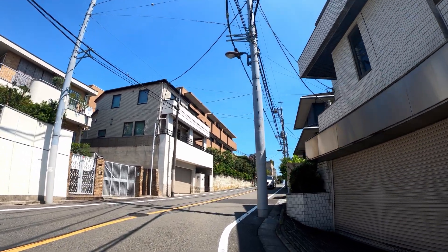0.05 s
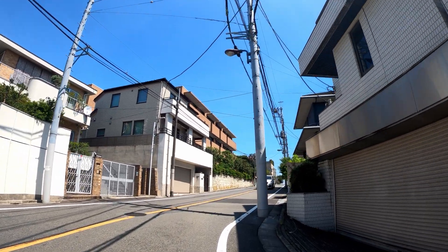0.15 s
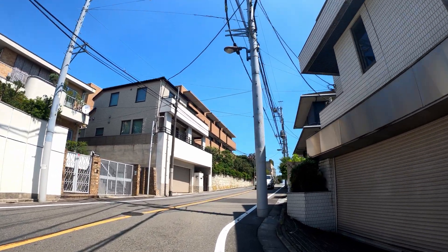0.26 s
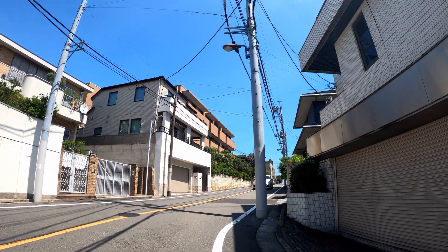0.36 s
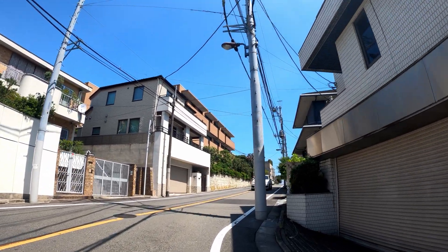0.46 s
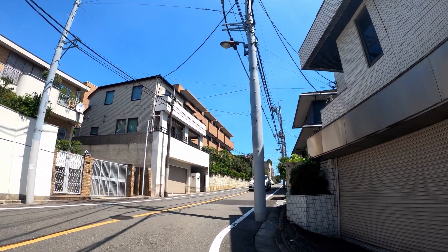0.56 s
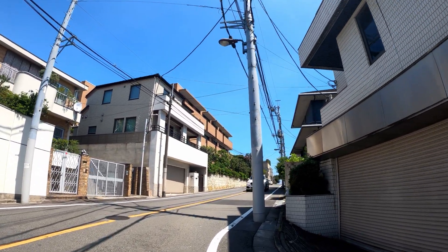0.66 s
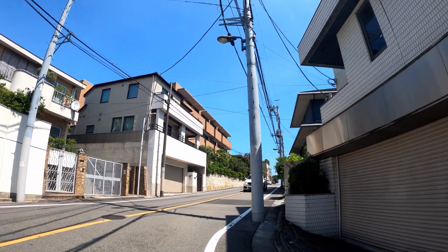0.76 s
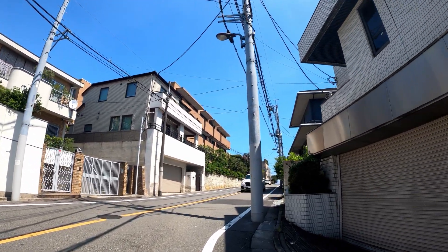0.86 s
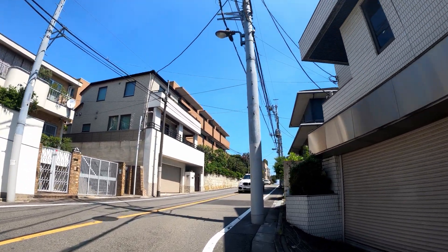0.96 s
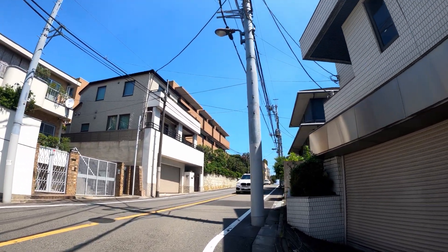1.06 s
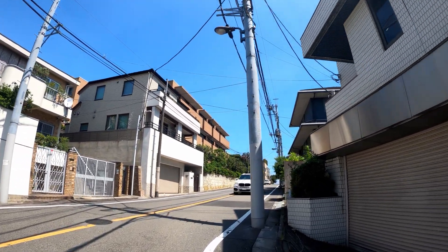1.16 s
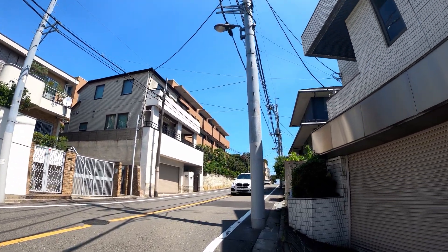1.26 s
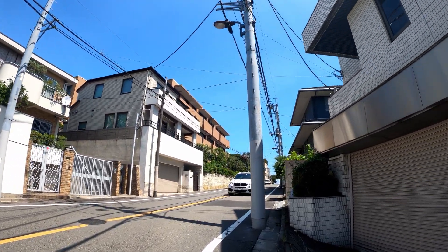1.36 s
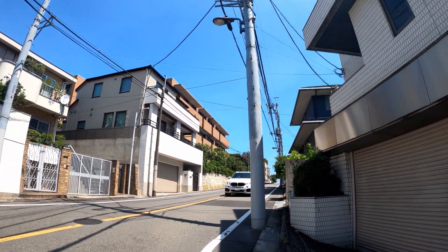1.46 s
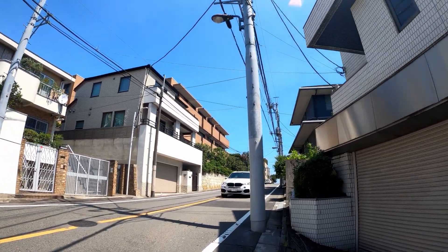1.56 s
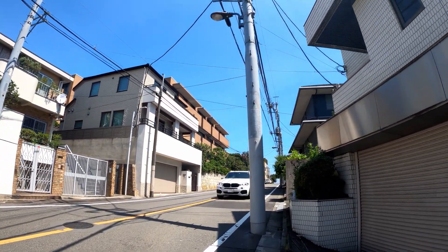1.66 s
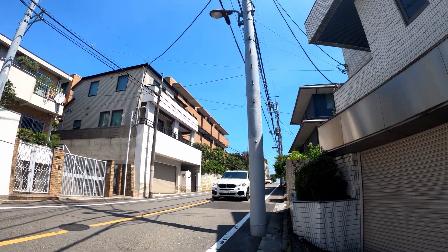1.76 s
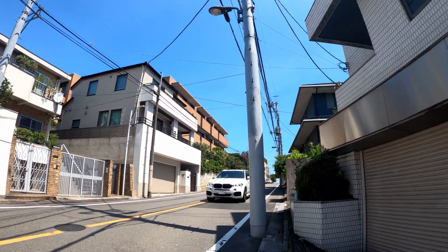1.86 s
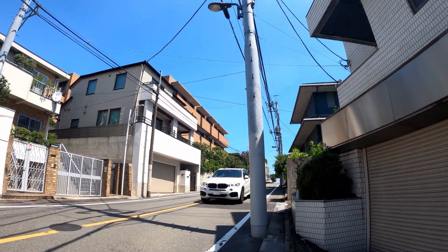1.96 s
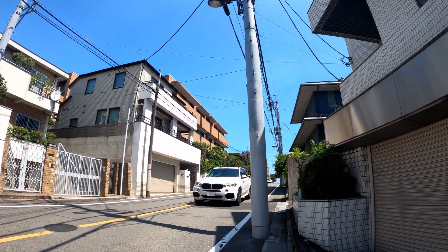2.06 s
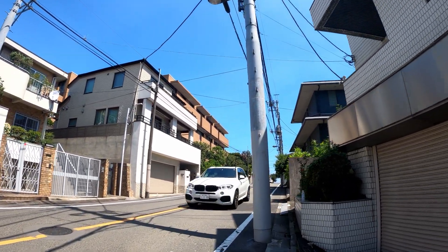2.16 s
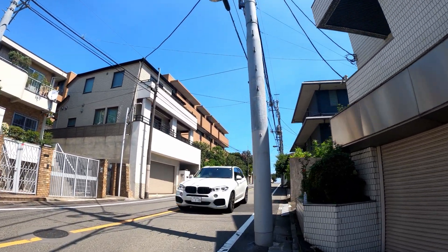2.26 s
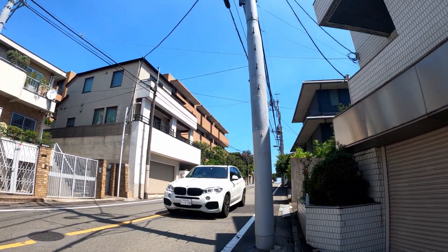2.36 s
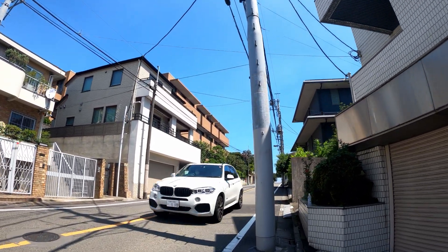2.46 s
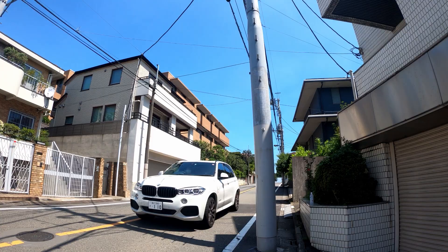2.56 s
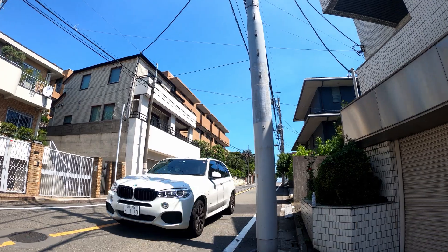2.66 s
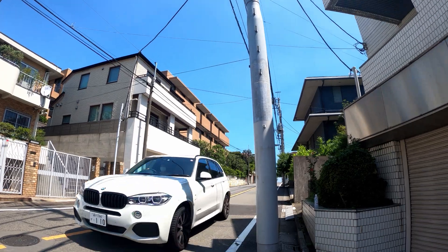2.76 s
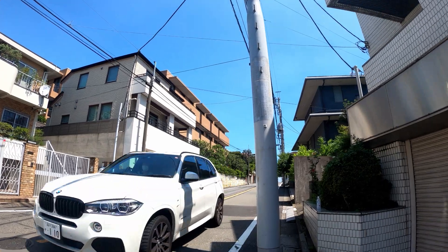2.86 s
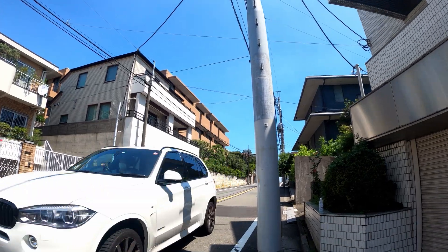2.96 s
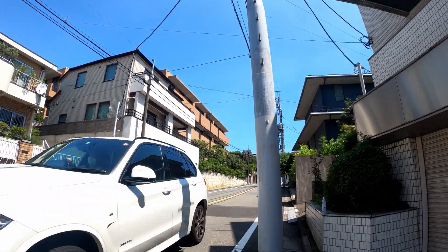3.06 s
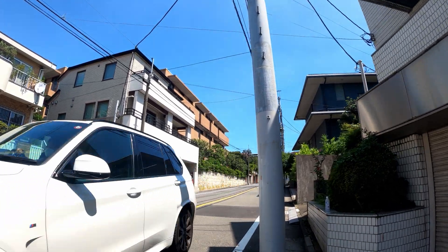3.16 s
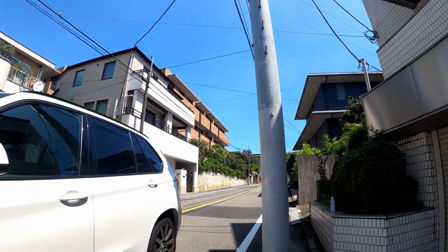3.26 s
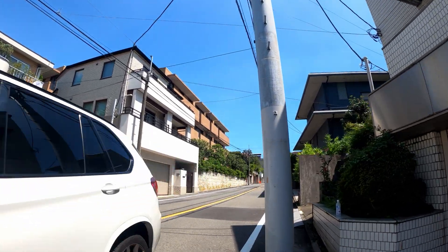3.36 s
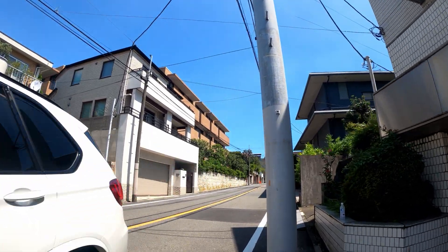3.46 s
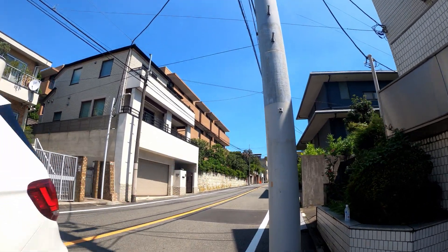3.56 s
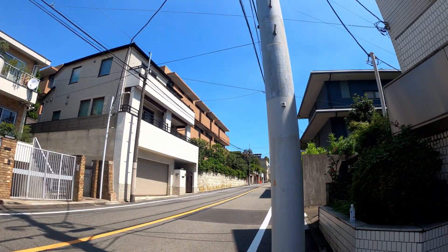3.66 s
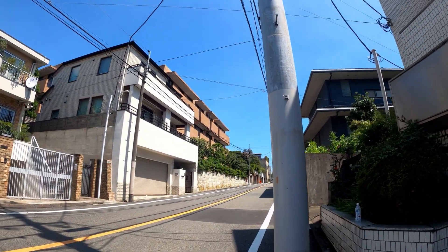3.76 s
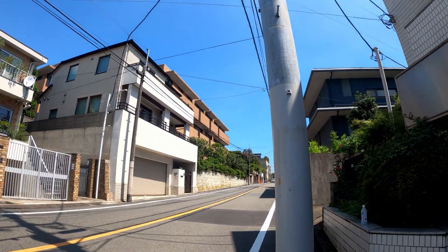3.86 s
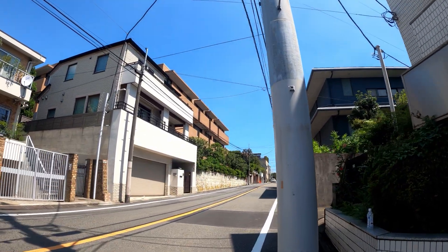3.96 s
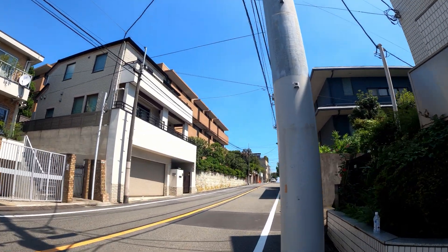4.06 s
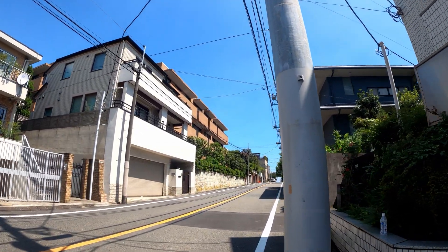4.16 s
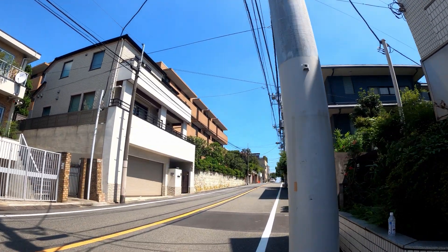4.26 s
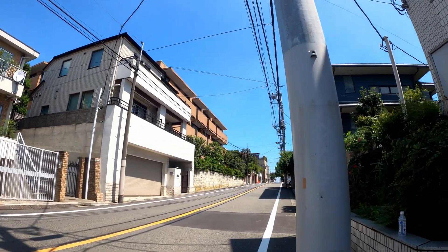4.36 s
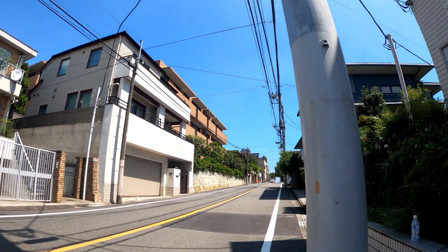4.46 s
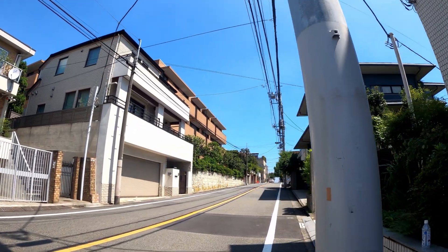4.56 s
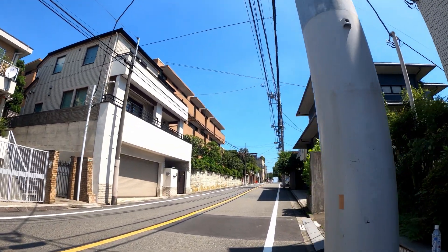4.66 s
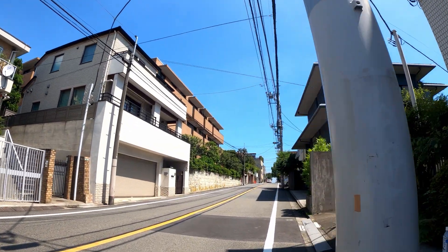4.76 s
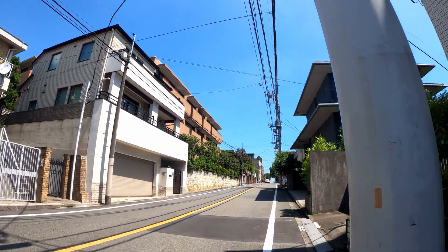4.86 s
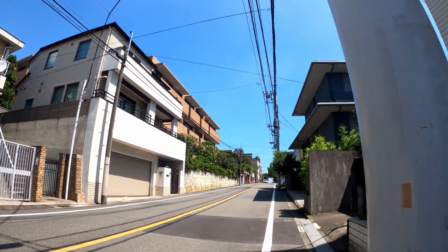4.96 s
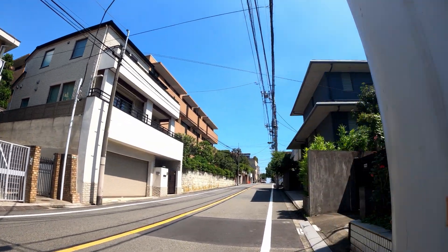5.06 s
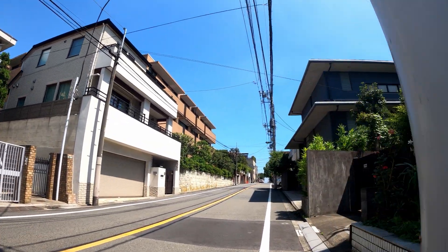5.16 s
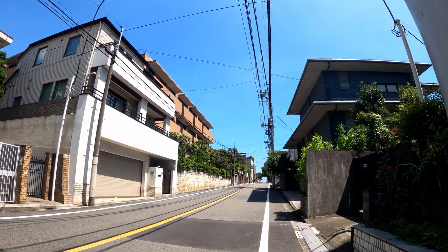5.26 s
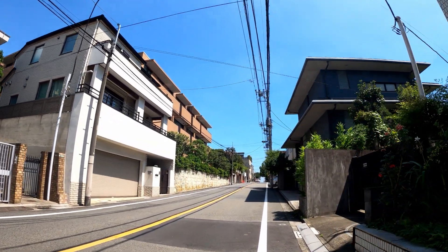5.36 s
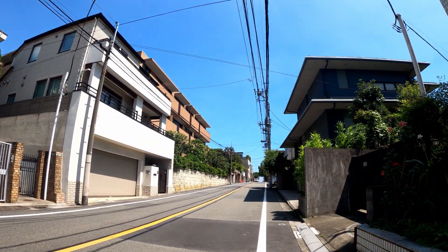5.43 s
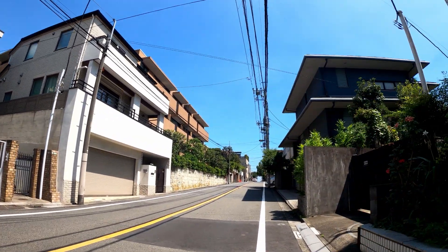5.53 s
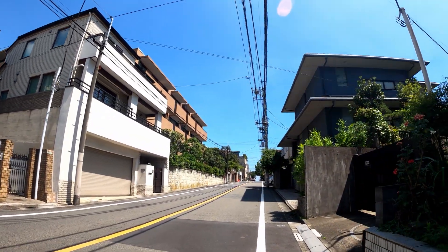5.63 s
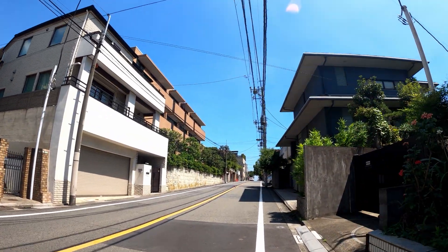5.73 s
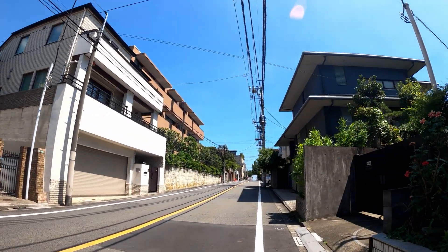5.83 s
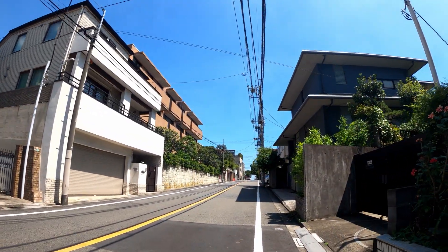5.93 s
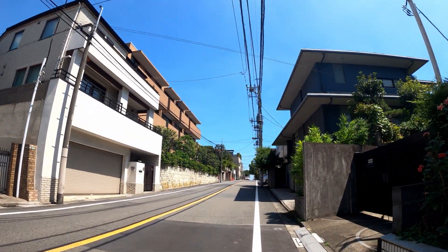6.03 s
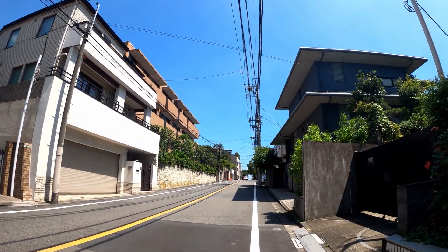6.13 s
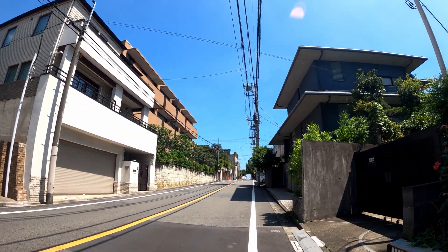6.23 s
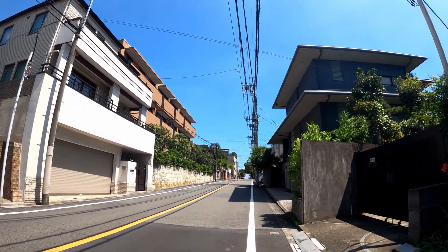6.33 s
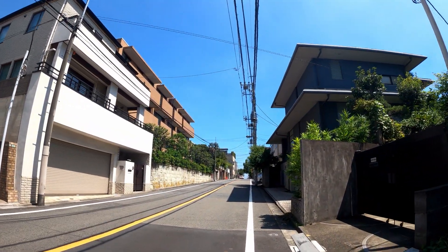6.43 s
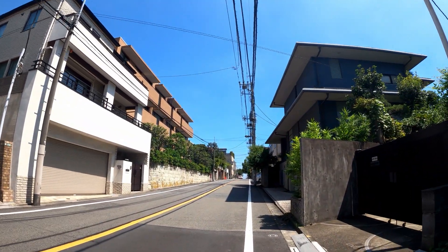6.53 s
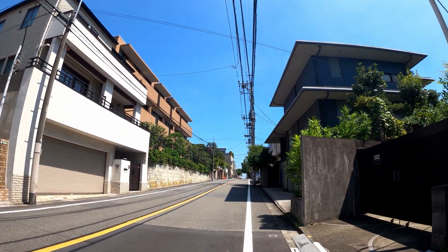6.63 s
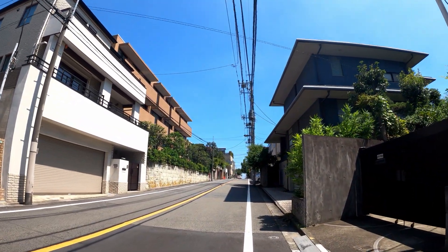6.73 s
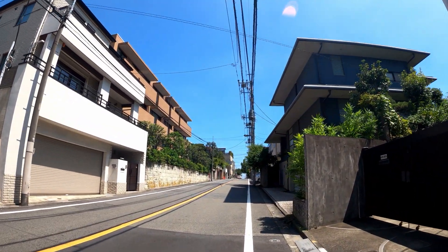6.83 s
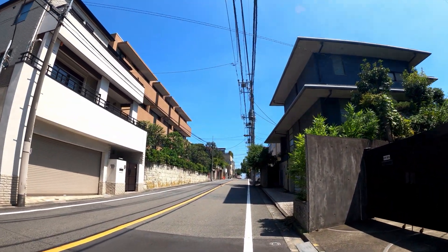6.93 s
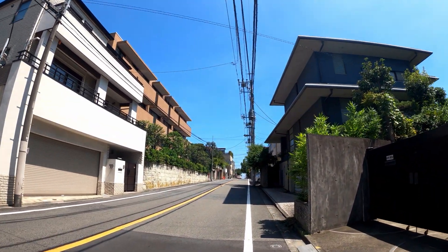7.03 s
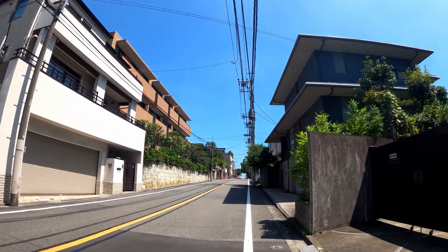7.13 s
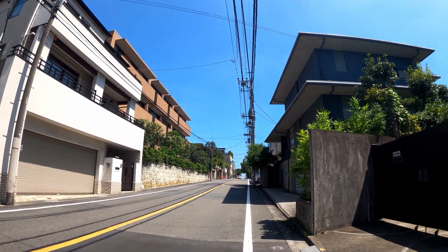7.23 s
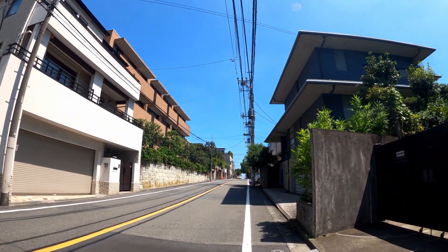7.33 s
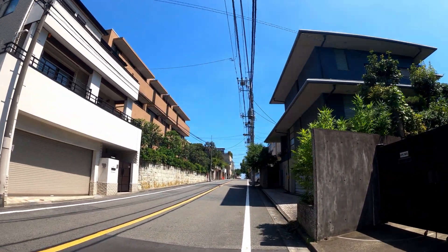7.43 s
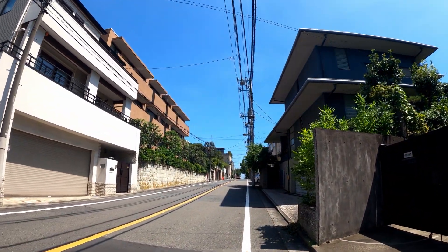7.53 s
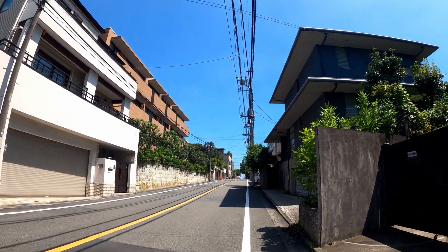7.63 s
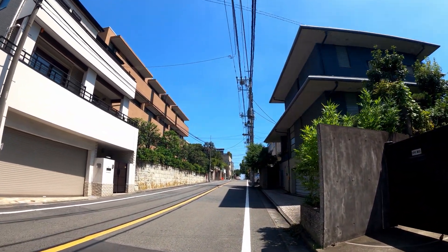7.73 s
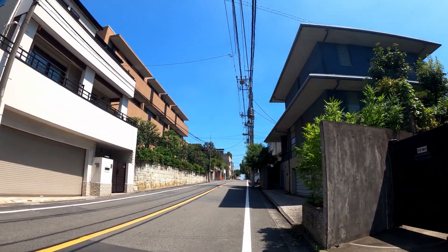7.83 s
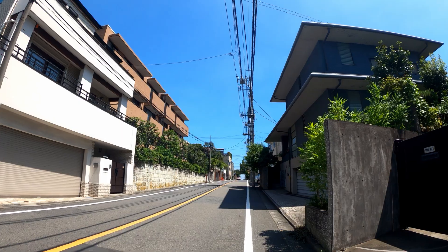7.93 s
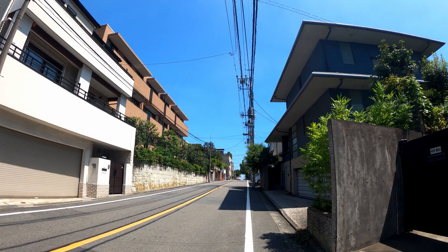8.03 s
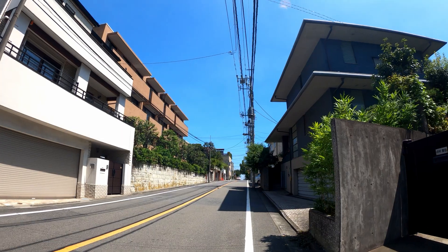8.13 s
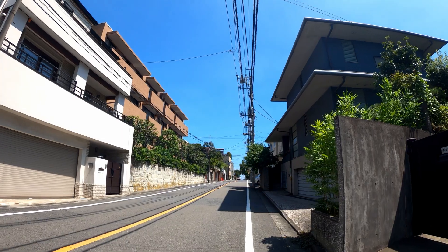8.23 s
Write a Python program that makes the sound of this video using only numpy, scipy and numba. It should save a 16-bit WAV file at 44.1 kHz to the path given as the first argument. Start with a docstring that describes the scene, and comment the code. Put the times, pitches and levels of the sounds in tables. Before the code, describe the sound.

A car approaches on a quiet summer street, roars past close by, shifts up and fades, while cicadas buzz and wind gusts knock the microphone.

```python
"""A quiet summer street, cicadas near and far, distant town air: noise bands and clicking drum lines.
A car rolls towards a small two-port camera; tyres roar and hum as noise bands, the engine drones as sines.
It passes close at about 3 s, its sizzle moves to the right, the engine shifts up and it pulls away.
Gusts (eddy noise) buffet the ports throughout, hardest at about 6.1 s, with sharp knocks inside the hard ones.
From then the camera folds its ports together below the top octave, narrowing the picture to the end."""
import sys
import numpy as np
from scipy import signal
from scipy.io import wavfile
from scipy.ndimage import uniform_filter1d
from numba import njit

SR = 44100
rng = np.random.default_rng(int(sys.argv[2]) if len(sys.argv) > 2 else 0)


def transcribe(u):
    """Save the signal u as a 16-bit wav file named by the first command-line argument.

    u: samples, shape (n,) or (channels, n), limited to [-1, 1]; the rate is SR.
    q: integer samples, one column per channel.
    """
    v = np.clip(np.atleast_2d(u).T, -1, 1)
    q = np.round(v * 32767).astype(np.int16)
    wavfile.write(sys.argv[1], SR, q)


N = 365588


# The car coming, passing and going. Each row: time in seconds, overall roar level in dB.
CAR_LEVEL = [(0, -38), (.45, -36), (1.35, -35), (2.25, -33), (2.6, -30.5), (3.0, -27.5), (3.3, -30.5),
             (3.6, -32.5), (3.9, -37.5), (4.9, -40.5), (5.15, -41.5), (5.6, -46), (6.1, -52.5),
             (6.7, -55.5), (7.0, -59), (8.29, -65)]
# Body, roar, rush, rasp, hiss, sizzle, fizz and spray of the car. Each row: centre in Hz, level in dB at the
# reference level, share of the level change followed, gain from the tail side in dB, gain when close in dB,
# how late it turns to the tail in seconds, how long the turn takes in seconds, gain in a full swish in dB.
ROAR_PARTS = [(420, -37.5, 0.95, 0.5, 0.5, -0.12, .3, -2), (968, -35.5, 1, 0.17, -0.4, -0.18, .3, 0),
              (1505, -44, 0.93, 3.5, -2, 0.47, 0.95, 3), (2170, -55, 0.89, 10.5, -2, -0.13, 0.13, 11.5),
              (2830, -54, 0.78, 5.5, -1.5, 0.013, 0.15, 7), (4000, -57, 0.72, 2.5, 5, -0.59, 0.33, 4),
              (5000, -63.5, 0.94, 1, 7, -0.069, .3, 6), (8500, -77, 0.92, 5, 9.5, -0.15, .3, 9)]
# Colour of the roar against a smooth slope. Each row: frequency in Hz, level in dB.
ROAR_COLOUR = [(260, -5.5), (400, -4.5), (520, -8.5), (700, -5), (950, -3.5), (1500, -1), (2400, -3),
               (4100, -1.5), (5000, -0.5), (6500, -6), (9400, -1), (12500, -21), (15500, -23.5)]
# Tread-groove resonances. Each row: centre in Hz, width in Hz, level in dB against the roar part.
TREAD = [(440, 70, -9), (945, 140, -7)]
# Brief brighter swells. Each row: peak in seconds, rise in seconds, strength 0 to 1 before its uneven scuffing.
SWISHES = [(3.15, 0.075, 0.4), (4.98, 0.19, 0.12), (5.28, 0.077, 0.89), (5.72, 0.19, 0.34),
           (6.847, 0.075, 0.52)]
# Side of the sizzle. Each row: time in seconds, left minus right in dB.
SIZZLE_PAN = [(2.9, 0.5), (3.8, -13), (5.4, -12), (5.7, -12), (6.7, -8)]
PASS_S, CLOSE_S, LOUD_DB = 3.13, 0.6, -34.5  # abreast at; time spent close; reference level
SWISH_FALL_SHARE = 2.8  # the fall is this much longer than the rise
SWISH_GRAIN, SWISH_GRAIN_RATE = .2, 40  # depth of the uneven scuffing, and steps per second
ROAR_SWELL_DB = .6


def roar():
    """Tread and engine-bay noise; each part of the spectrum swells as its side of the car faces the camera."""
    t = seconds()
    (level_db,), (pan_db,) = curves(CAR_LEVEL), curves(SIZZLE_PAN)

    swish = 0
    for peak, rise, strength in SWISHES:
        away = np.maximum((peak - t) / rise, (t - peak) / rise / SWISH_FALL_SHARE)
        swish = swish + strength * np.exp(-away ** 2)
    swish = swish * (1 + SWISH_GRAIN * walk(SWISH_GRAIN_RATE))

    parts_db = []
    for _, db, follow, tail_db, close_db, late, turn, swish_db in ROAR_PARTS:
        since_pass = t - PASS_S - late
        tail = tail_db * (1 + np.tanh(since_pass / turn)) / 2
        close = close_db * np.exp(-(since_pass / CLOSE_S) ** 2)
        swell = swish_db * swish + ROAR_SWELL_DB * walk(rate=4.79)
        parts_db.append(db + follow * (level_db - LOUD_DB) + tail + close + swell)
    parts_db = np.array(parts_db)

    out = sum(heard(hz, width) * undb(parts_db[1] + db) for hz, width, db in TREAD)
    part_log_hz = np.log(np.transpose(ROAR_PARTS)[0])
    for hz in bands(271.7, 15500):
        # each band blends the two parts beside it in pitch
        share = [np.interp(np.log(hz), part_log_hz, row) for row in np.eye(len(ROAR_PARTS))]
        band_db = share @ parts_db + at(ROAR_COLOUR, hz)[0] + 0.8 * walk(9)
        panned = share[-3] + .5 * share[-2]  # sizzle fully, fizz by half
        side_db = panned * np.array([pan_db, -pan_db]) / 2
        out = out + heard(hz, .24 * hz) * undb(band_db + side_db)
    return out


# Exhaust. Each row: time in seconds, firing rate in Hz, then the levels in dB of the firing rate itself,
# its second order and its third order.
ENGINE = [(1.5, 69.8, -59, -41, -40), (1.95, 69.35, -35.5, -40, -45), (2.35, 68, -33, -39, -42),
          (2.73, 64.76, -30, -29.5, -29.5), (3.0, 62.3, -25.5, -36, -33), (3.26, 59.44, -18.5, -35, -37),
          (3.55, 56.46, -21.5, -40, -41), (3.72, 56.08, -27, -44, -25.5), (3.89, 57.1, -38.5, -50, -34),
          (4.2, 61.7, -29.5, -45, -47), (4.48, 70.35, -37, -48, -46), (4.63, 75, -27, -20, -47),
          (4.84, 79.9, -28.5, -45, -47), (5.17, 78, -28, -37, -50), (5.38, 69.13, -70, -36.5, -52),
          (5.62, 66.4, -26, -33.5, -45), (5.8, 63.8, -38, -35.5, -39), (5.9, 59.7, -31, -47, -48),
          (6.25, 59.4, -66, -80, -78)]
# Waver of those three orders in dB: the higher ones break up more.
ORDER_WAVER_DB = .8, 2.5, 3


def engine():
    """Firings leave the silencer as a drone with wavering upper orders and a faint half order."""
    hz, *order_db = curves(ENGINE)
    turn = 2 * np.pi * np.cumsum(hz * (1 + 0.00603 * walk(14))) / SR
    orders = 0
    for order, (db, waver) in enumerate(zip(order_db, ORDER_WAVER_DB), start=1):
        orders = orders + undb(db + waver * walk(12)) * np.sin(order * turn)
    half_order = 0.063 * undb(order_db[0]) * np.sin(turn / 2)
    return np.sqrt(2) * (orders + half_order)


# Pitch of the tyre hum, sagging as the car passes. Each row: time in seconds, frequency in Hz.
HUM_HZ = [(0, 219), (1.5, 216), (2.5, 212), (3.1, 202), (8.29, 198)]
# Tyre hum. Each row: time in seconds, level in dB before its waver.
HUM_LEVEL = [(0, -42), (.7, -31), (1.05, -36), (1.55, -23), (1.75, -29.5), (2.2, -22), (2.5, -23.5),
             (2.68, -40), (2.92, -31.5), (3.08, -23), (3.2, -35), (3.36, -26), (3.5, -37), (3.65, -36.5),
             (3.81, -26), (3.95, -36), (4.2, -47), (4.52, -24), (4.7, -40.5), (5.4, -36.5), (5.9, -41),
             (6.3, -62), (8.29, -51)]
# Boom of the body. Each row: time in seconds, level in dB.
BOOM_LEVEL = [(0, -41.5), (0.449, -31.5), (.9, -42.5), (1.9, -30.5), (2.15, -34.5), (2.9, -24), (3.3, -37),
              (3.53, -25.5), (3.9, -33), (4.24, -26.5), (4.75, -33), (4.951, -24), (5.32, -36), (5.9, -43),
              (6.3, -46), (8.29, -59)]
# Road rumble. Each row: time in seconds, level in dB of its lowest band.
RUMBLE_LEVEL = [(0, -34), (1.0, -30.5), (1.9, -34.5), (2.3, -34), (3.0, -29), (3.8, -31.5), (4.8, -36.5),
                (5.35, -31), (5.9, -36.5), (6.3, -38), (8.29, -89)]
HUM_WIDTH_HZ, BOOM_HZ, BOOM_WIDTH_HZ = 16, 153, 30
HUM_WAVER_DB, HUM_WAVER_RATE, HUM_WANDER_HZ = 1.8, 20, 1  # rate in steps per second


def hum():
    """The air ring inside the tyres, a boom of the body and the road's rumble: noise in narrow resonances."""
    (hum_hz,), (hum_db,) = curves(HUM_HZ), curves(HUM_LEVEL)
    (boom_db,), (rumble_db,) = curves(BOOM_LEVEL), curves(RUMBLE_LEVEL)
    ring_level = undb(hum_db + HUM_WAVER_DB * walk(HUM_WAVER_RATE))
    ring = ring_level * steadier(heard(hum_hz + HUM_WANDER_HZ * walk(5), HUM_WIDTH_HZ), .09, .7)
    boom = undb(boom_db) * steadier(heard(BOOM_HZ, BOOM_WIDTH_HZ), .03, .4)
    road = heard(36.7, 41) + 0.34 * heard(82.4, 39) + 0.31 * heard(106.0, 46) + .5 * heard(231.0, 82)
    return ring + boom + undb(rumble_db) * road


# Gusts on the microphone ports. Each row: peak in seconds, half length in seconds, rumble in dB and flutter
# in dB (both before PORT_LIFT_DB), left minus right in dB.
GUSTS = [(0.82, 0.12, -40, -56, 5), (1.443, 0.091, -30.5, -40.5, 1), (1.66, 0.11, -33, -48, -11),
         (1.746, 0.0547, -21.5, -33, -5), (1.984, 0.12, -31, -54.5, -5), (2.098, 0.04526, -26, -34, -12),
         (2.202, 0.04294, -30, -33.5, -14), (2.375, 0.047, -34, -39.5, -4), (2.734, 0.0755, -29, -38.5, -5),
         (2.9, 0.03, -32, -49, -15), (3.176, 0.036, -29, -43.5, -7), (3.502, 0.02835, -26, -31, -2),
         (3.748, 0.0367, -27.5, -32.5, -12), (3.896, 0.077, -36, -58, 5), (5.513, 0.091, -32.5, -41, -2),
         (5.75, 0.18, -33, -61, -2), (5.935, 0.051, -25, -44.5, 7), (5.981, 0.0393, -28.5, -38, 14),
         (6.06, 0.0195, -17, -30, -4), (6.085, 0.0199, -17, -25.5, -1), (6.111, 0.01965, -17, -23, -0.5),
         (6.132, 0.02104, -25, -24, 18), (6.179, 0.02555, -22, -27.5, -0.5),
         (6.216, 0.0361, -20.5, -33, -3), (6.284, 0.0384, -24.5, -34, -11), (6.329, 0.0357, -29.5, -36, 13),
         (6.446, 0.0493, -34.5, -34.5, 12), (6.579, 0.0396, -37, -34, 9), (6.624, 0.035, -32, -45.5, -7),
         (6.904, 0.1162, -39, -38.5, -6), (7.13, 0.02211, -28.5, -32.5, -7), (7.164, 0.0249, -31, -37, -4),
         (7.209, 0.0249, -23, -29.5, 1), (7.238, 0.0154, -30, -33, 17), (7.292, 0.0392, -30, -35, -1),
         (7.371, 0.039, -33, -40, 5), (7.484, 0.04, -34, -41, 1), (7.678, 0.088, -36.5, -49, 7.5),
         (7.995, 0.11, -40, -39.5, -1)]
GUST_FALL_DB, GUST_RISE_SHARE = 9, .8  # fall over a half length; the rise takes this share of the time
BREEZE_DB, BREEZE_FLUTTER_DB = -55.5, -58  # faint breeze beneath, also before the lift
PORT_LIFT_DB = 3


def gusts():
    """Rumble dB, flutter dB and pan: gusts rise and fall alike over a breeze; the stronger sway the side more."""
    peak, half, rumble_db, flutter_db, pan_db = np.transpose(GUSTS)[:, :, None]
    t = seconds()[::32]  # a coarse grid is enough
    away = (t - peak) / half
    fall_db = GUST_FALL_DB * np.maximum(away, -away / GUST_RISE_SHARE)
    # powers add up
    rumbles, flutters = undb(2 * (rumble_db - fall_db)), undb(2 * (flutter_db - fall_db))
    rumble = rumbles.sum(axis=0) + undb(2 * BREEZE_DB)
    flutter = flutters.sum(axis=0) + undb(2 * BREEZE_FLUTTER_DB)
    pan = (pan_db * rumbles).sum(axis=0) / rumble
    return curves(np.transpose([t, 10 * np.log10(rumble), 10 * np.log10(flutter), pan]))


def eddies(speed, lo_hz, hi_hz):
    """A frozen train of like-sized eddies carried past a port: the faster the air, the higher it sounds."""
    train = signal.sosfilt(signal.butter(5, hi_hz, fs=SR, output="sos"), rng.standard_normal(3 * N))
    train = signal.sosfilt(signal.butter(2, lo_hz, "high", fs=SR, output="sos"), train)
    train = steadier(train, 1 / lo_hz, .4)
    return unit(np.interp(np.cumsum(speed), np.arange(3 * N), train))


def wind():
    """Air buffets each port with its own unrelated eddies; harder gusts move faster."""
    rumble_db, flutter_db, pan_db = gusts()
    speed = np.clip(undb(.4 * (flutter_db + 35)), .7, 2.9)
    ports = []
    for side in (1, -1):
        flutter = eddies(speed, 85, 225) * undb(flutter_db + PORT_LIFT_DB)
        rumble = eddies(np.sqrt(speed), 40, 100) * undb(rumble_db + PORT_LIFT_DB)
        ports.append((flutter + rumble) * undb(side * pan_db / 2))
    return np.array(ports)


# Sharp knocks on the ports inside hard gusts. Each row: peak in seconds, pitch in Hz, peak level in dB,
# left minus right in dB, fall in turns of the pitch.
KNOCKS = [(6.072, 420, -17, 9, 1.8), (6.094, 304, -13, 5, 1), (6.104, 322, -20, 0, 1),
          (6.114, 340, -18, 5, 1.5), (6.128, 280, -11.5, 4, 1.2), (6.151, 298, -18, 2, 1),
          (6.167, 225, -15, -5, 1.6), (6.192, 304, -24, 8, 1.5), (7.116, 175, -25.5, 0, 1.8),
          (7.135, 151, -18, 4, 2.4), (7.19, 168, -19.5, -13, 1), (7.205, 215, -18, 0, 1.5),
          (7.231, 222, -19.5, -3, 1.4), (7.274, 179, -25, 0, 1.6), (7.3, 190, -26.5, 2, 2.2),
          (7.484, 305, -31, 0, 1.6), (7.525, 480, -38, -6, 2.2)]
KNOCK_RISE_TURNS, KNOCK_EDGE_DB = .6, -13
KNOCK_APART_TURNS = .2  # each port is shifted by up to this, in opposite directions


def knocks():
    """Each knock swings a few turns and has a harder edge about an octave up."""
    out = np.zeros((2, N))
    opposite = np.array([[1], [-1]])
    for (s, hz, db, pan_db, fall), chance in zip(KNOCKS, rng.random((len(KNOCKS), 3))):
        span = slice(int((s - .03) * SR), int((s + .05) * SR))
        turns = (seconds()[span] - s) * hz
        shape = np.exp(-np.maximum(-turns / KNOCK_RISE_TURNS, turns / fall) ** 2)
        apart = KNOCK_APART_TURNS * chance[2] * opposite
        swing = np.sin(2 * np.pi * (turns + chance[0] + apart))
        edge = undb(KNOCK_EDGE_DB) * shape * np.sin(2 * np.pi * (1.9 * turns + chance[1]))
        out[:, span] += shape * (swing + edge) * undb(db + pan_db * opposite / 2)
    return out


# Cicadas far and near. Each row: time in seconds, far chorus in dB, near singer in dB before its modes and
# throb, lift of the singer's two upper modes in dB.
CICADAS = [(0, -52, -67, -9), (.8, -52.5, -73, -10), (1.7, -52, -75, -5), (3.0, -55.5, -78, -7),
           (3.6, -56.5, -77, -8), (4.6, -52, -73, -5), (5.35, -53, -63, -6), (5.7, -50.5, -67, -8),
           (6.0, -50.5, -60, -2), (6.3, -54.5, -66, -2), (6.6, -54, -70, 1), (6.9, -52, -65, 3),
           (7.2, -52.5, -63, 0), (7.4, -50.5, -63.5, -2), (7.8, -51, -58, -2), (8.0, -50.5, -60, -1),
           (8.29, -51, -64, -2)]
# Colour of the far chorus before it is levelled. Each row: frequency in Hz, relative density in dB per Hz.
CHORUS = [(4000, -40.5), (4690, -8.5), (5250, 2), (5780, -2), (6300, -4), (6900, -11), (8310, -17.5),
          (9960, -28), (12100, -25), (13500, -29.5), (15500, -35)]
# Drum modes of the near singer. Each row: centre in Hz, width in Hz, level in dB before lift and throb,
# throb lag in turns, sweep in each throb in Hz, lines halfway between the click multiples in dB.
SINGER = [(5680, 1300, 0, 0, 0, -12), (8250, 1100, -13.5, .5, 350, -1), (14100, 600, -33, .5, 0, -1)]
# The middle mode sits lower at first. Each row: time in seconds, how much lower in Hz.
UPPER_SAG_HZ = [(0, 700), (7.2, 700), (7.5, 0)]
CLICK_HZ, THROB_HZ, THROB_PEAK_S = 372.7, 15.75, 7.752
THROB_DB, LINE_FLICKER_DB, THROB_SCATTER_DB = 10, 1.8, 1  # the throb swings this far up and down


def cicadas():
    """A far chorus blurs into hiss; a near singer clicks its drum and throbs, its lines flickering one by one."""
    chorus_db, near_db, upper_db = curves(CICADAS)
    chorus = 0
    for hz in 4000 * 2 ** np.arange(0, 2, 1 / 6):
        # root of the frequency: wider bands hold more noise
        chorus = chorus + heard(hz, 0.2 * hz) * undb(at(CHORUS, hz)[0] + walk(rate=9)) * np.sqrt(hz)

    turn = 2 * np.pi * np.cumsum(CLICK_HZ * (1 + 0.0016 * walk(30))) / SR
    throb = THROB_HZ * (seconds() - THROB_PEAK_S) + .02 * walk(8)
    lifts, sags = (0, upper_db, upper_db), (0, curves(UPPER_SAG_HZ)[0], 0)
    singer = 0
    for (hz, width, db, lag, sweep, half_db), lift_db, sag in zip(SINGER, lifts, sags):
        throb_angle = 2 * np.pi * (throb - lag)
        centre = hz - sag + sweep * np.sin(throb_angle)
        lowest = round((hz - 1.1 * width) / CLICK_HZ)
        drum = 0
        for k in np.arange(lowest, (hz + .7 * width) / CLICK_HZ, .5):
            level = undb(half_db * 2 * (k % 1) + LINE_FLICKER_DB * walk(18))
            resonance = 1 / (1 + (2 * (k * CLICK_HZ - centre) / width) ** 4)
            drum = drum + level * np.sin(k * turn + 6 * rng.random()) * resonance
        throb_db = THROB_DB * np.cos(throb_angle) + THROB_SCATTER_DB * walk(12)
        singer = singer + unit(drum) * undb(db + lift_db + throb_db)
    return unit(chorus) * undb(chorus_db) + singer * undb(near_db)


# Small thin tones. Each row: start in seconds, length in seconds, starting pitch in Hz, peak level in dB.
CHIRPS = [(1.405, .035, 8800, -66), (5.432, .035, 2760, -47.5), (7.16, .11, 435, -43),
          (7.315, .045, 435, -40)]


def chirps():
    """Short thin tones that swell, fade and sag slightly in pitch."""
    out = np.zeros(N)
    for start, length, hz, db in CHIRPS:
        u = np.clip((seconds() - start) / length, 0, 1)
        tone = np.sin(2 * np.pi * np.cumsum(hz * (1 - .03 * u)) / SR)
        out += undb(db) * np.sin(np.pi * u) * tone
    return out


# Colour of the town before it is levelled. Each row: frequency in Hz, relative density in dB per Hz.
TOWN = [(15, -32), (25, 5.5), (59, 6.5), (112, -24.5), (169, 2.5), (406, -13.5), (492, -12), (584, -16),
        (3770, -35), (4200, -39.5), (5460, -70), (9240, -120)]
TOWN_DB = -43


def town():
    """Distant traffic and air that never stop: wavering noise bands."""
    out = 0
    for hz in bands(30.35, 4200):
        out = out + heard(hz, 0.33 * hz) * undb(at(TOWN, hz)[0] + 1.8 * walk(12)) * np.sqrt(hz)
    return unit(out) * undb(TOWN_DB)


# The camera's pair of ports. Each row: frequency in Hz, likeness of the two from -1 to 1,
# left minus right in dB, lead of the left in radians.
PORTS = [(60, 1, -1, 0.091), (200, 1, -1, 0.095), (480, 1, -1.5, 0.21), (970, 0.85, -3.5, 0.034),
         (2020, 0.71, -5.5, 1.53), (3500, 0.98, 1, 0.99), (5800, -0.078, -0.5, 0.13),
         (8350, -0.33, -0.5, 0.12), (12000, 0.32, -1, 0.27)]


def heard(hz, width_hz):
    """A band of street noise as the two ports catch it: partly shared, the left one turned ahead in phase."""
    like, pan_db, lead = at(PORTS, np.mean(hz))
    like = np.clip(like, -1, 1)
    shared, apart = noise(hz, width_hz), noise(hz, width_hz)
    # the slope of a narrow band runs a quarter turn ahead of it
    ahead = np.cos(lead) * shared + np.sin(lead) * unit(np.gradient(shared))
    left = like * ahead + np.sqrt(1 - like ** 2) * apart
    return np.array([left * undb(pan_db / 2), shared * undb(-pan_db / 2)])


def noise(hz, width_hz):
    """White noise through a steep band, at unit RMS."""
    return unit(band(rng.standard_normal(N), hz, width_hz))


def band(x, hz, width_hz):
    """A steep band: the resonance applied twice."""
    g, k = np.tan(np.pi * hz / SR) + np.zeros(N), width_hz / hz + np.zeros(N)
    return svf(svf(x, g, k), g, k)


@njit
def svf(x, g, k):
    """State-variable band-pass whose centre may move, gain 1 at the centre."""
    y, b, l = np.empty(len(x)), 0., 0.  # b and l: band and low states
    for i in range(len(x)):
        v = (b + g[i] * (x[i] - l)) / (1 + g[i] * (g[i] + k[i]))
        b, l, y[i] = 2 * v - b, l + 2 * g[i] * v, k[i] * v
    return y


def steadier(x, window_s, share):
    """Evens out a share of the chance swells of a noise."""
    power = uniform_filter1d(x ** 2, size=int(window_s * SR))
    return unit(x / power ** (share / 2))


def walk(rate):
    """Random levels held 1 / rate s and slewed twice; spread near 1."""
    k = int(SR / rate)
    held = np.repeat(rng.standard_normal(N // k + 1), k)
    return 1.4 * uniform_filter1d(uniform_filter1d(held, k), k)[:N]


def bands(lo_hz, hi_hz):
    """Centres a quarter octave apart."""
    return lo_hz * 2 ** np.arange(0, np.log2(hi_hz / lo_hz), 1 / 4)


def curves(table):
    """Columns of a table, one value per sample."""
    s, *columns = np.transpose(table)
    return [np.interp(seconds(), s, c) for c in columns]


def at(table, hz):
    """Columns of a spectrum at one frequency."""
    f, *columns = np.transpose(table)
    return [np.interp(np.log(hz), np.log(f), c) for c in columns]


def seconds():
    """Time of every sample."""
    return np.arange(N) / SR


def undb(db):
    """Decibels to amplitude."""
    return 10 ** (np.asarray(db) / 20)


def unit(x):
    """Scales to an RMS of 1."""
    return x / np.sqrt(np.mean(x ** 2))


def scene():
    """Everything that reaches the two ports."""
    return roar() + engine() + hum() + wind() + knocks() + cicadas() + chirps() + town()


# Level of the top octave. Each row: time in seconds, lift in dB.
TOP_LIFT = [(0, -1), (6.2, 2), (6.5, 1), (6.8, 6.5), (8.29, 4.5)]
FOLD_HZ, TOP_HZ = 11200, 15600  # above the first the ports stay apart; the second is the upper limit
# the side fades from FOLD_S at this rate until FOLD_END_S, then drops within 0.1 s to FOLDED_DB
FOLD_S, FOLD_DB_PER_S, FOLD_END_S, FOLDED_DB = 6.17, 30, 7.4, -60.5


def record(dry):
    """The side signal fades below the top octave when the ports are folded; then the top is cut."""
    pair = np.array([dry[0] + dry[1], dry[0] - dry[1]]) / 2  # mid and side
    faded_db = -FOLD_DB_PER_S * (FOLD_END_S - FOLD_S)
    side_db = np.interp(seconds(), [FOLD_S, FOLD_END_S, FOLD_END_S + .1], [0, faded_db, FOLDED_DB])
    top = signal.sosfiltfilt(signal.butter(8, FOLD_HZ, "high", fs=SR, output="sos"), pair)
    folded = (pair - top) * [np.ones(N), undb(side_db)]
    mid, side = folded + top * undb(curves(TOP_LIFT)[0])
    cut = signal.ellip(12, .2, 70, TOP_HZ, fs=SR, output="sos")
    return signal.sosfilt(cut, np.array([mid + side, mid - side]))


dry = scene()
out = record(dry)
transcribe(out)
```